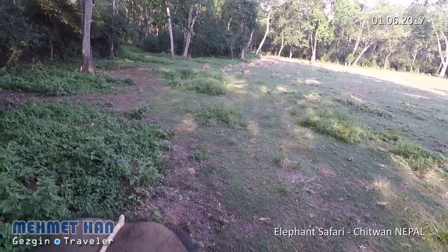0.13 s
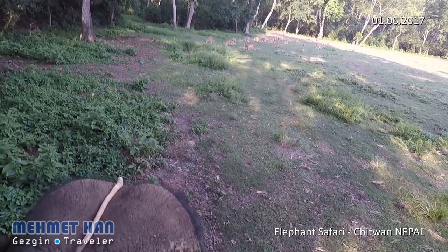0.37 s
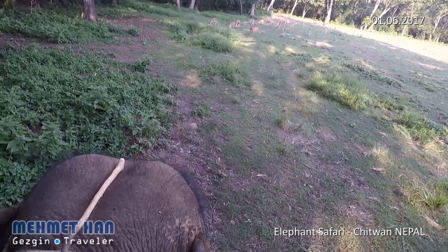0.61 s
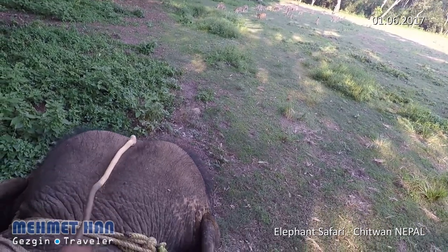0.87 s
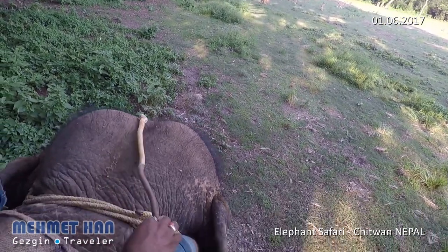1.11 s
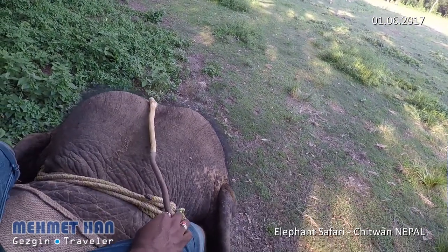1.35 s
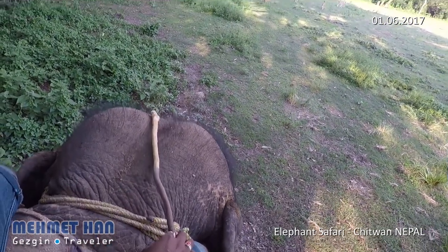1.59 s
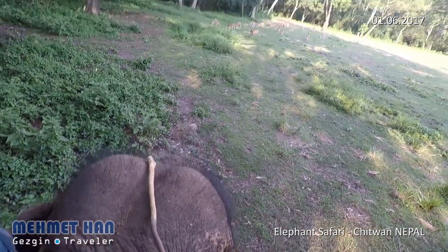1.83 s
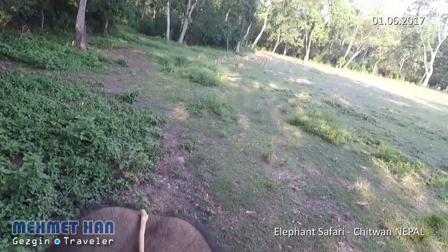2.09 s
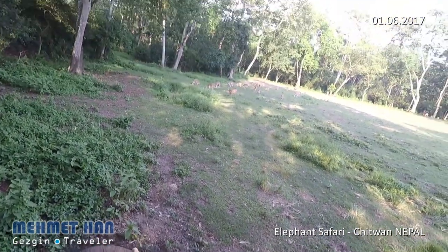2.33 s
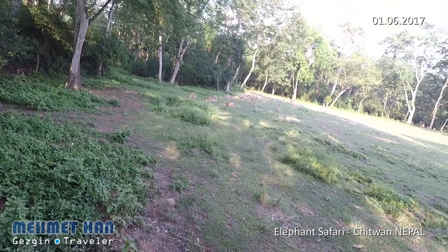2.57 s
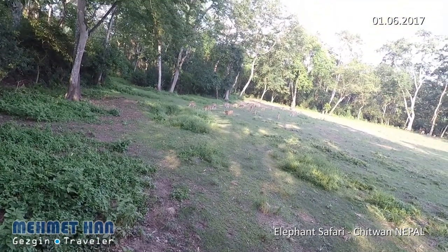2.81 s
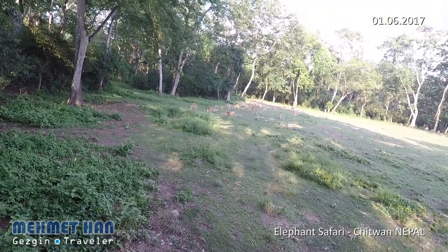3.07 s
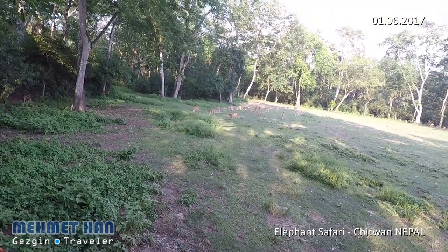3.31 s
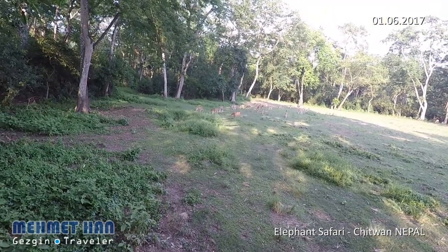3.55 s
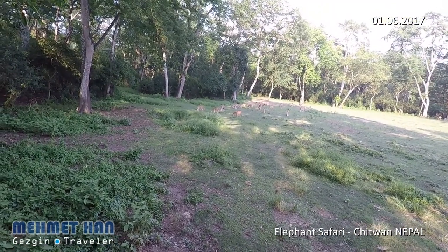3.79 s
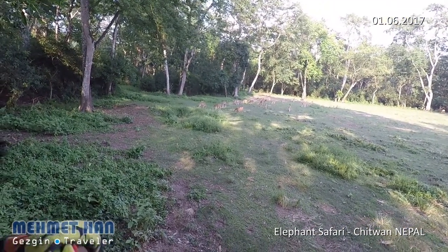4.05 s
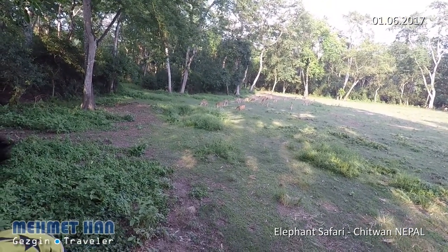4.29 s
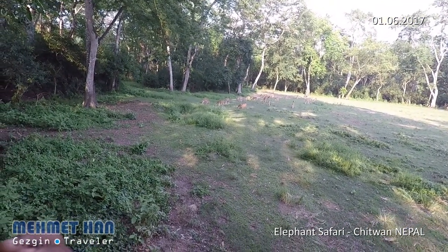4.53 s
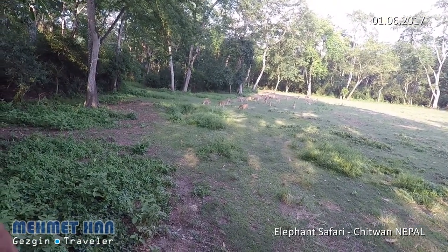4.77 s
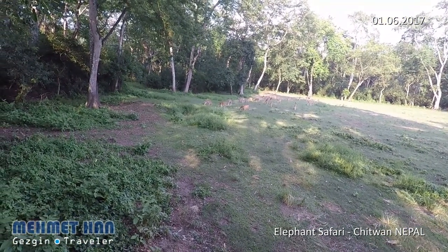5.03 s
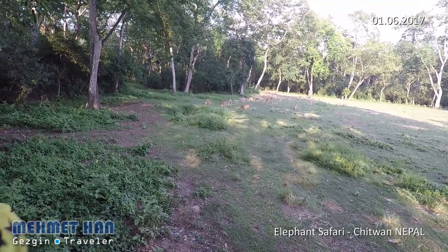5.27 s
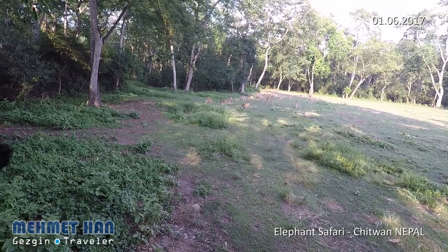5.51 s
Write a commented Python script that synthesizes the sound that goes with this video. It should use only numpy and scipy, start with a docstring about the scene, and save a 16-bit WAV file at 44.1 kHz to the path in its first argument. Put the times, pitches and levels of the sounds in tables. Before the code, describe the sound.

Outdoors at a forest edge, countless cicadas merge into one bright, sizzling high hiss. Beneath it lie soft low air noise and a weak rumble that sinks away. A small tick and muffled body knocks come from the handheld camera area during the first half, while a distant ground bird gives four short clucking, whistling phrases. One tiny two-toned gliding pipe follows past the middle, lightly scattered by the trees.

```python
"""A dense cicada chorus fills an open forest: overlapping click trains, coloured by ribbed membranes.
Under it lie a low wash of air, microphone hiss and a sinking rumble, all filtered noise.
A tick of filtered noise and soft knocks, summed decaying body modes, come early; two microphone ports hear all.
A far ground bird repeats two clucks, a burry whistle and a cluck, from ringing snaps and a noisy tone.
Late on, another bird pipes once with two gliding tones; trunks scatter the birds and the tick."""
import sys
import numpy as np
from scipy import signal
from scipy.fft import rfft, irfft
from scipy.io import wavfile
from scipy.ndimage import uniform_filter1d

SR = 44100
rng = np.random.default_rng(int(sys.argv[2]) if len(sys.argv) > 2 else 0)


def generate_wav(sig):
    """Save sig (samples, or channels by samples) to the path in sys.argv[1] as 16-bit PCM at SR."""
    pcm = np.round(np.clip(np.atleast_2d(sig).T, -1, 1) * 32767).astype(np.int16)
    wavfile.write(sys.argv[1], SR, pcm)


def elevation(decibels):
    """Turn decibel levels (scalar or array-like) into linear amplitude ratios."""
    levels = np.asarray(decibels, float)
    return 10 ** (levels / 20)


N = 248283  # samples


def evened(x):
    """Scales to rms 1."""
    return x / np.sqrt(np.mean(x ** 2) + 1e-20)


def smooth_twice(x, size, axis=-1):
    """Two running means of size samples."""
    return uniform_filter1d(uniform_filter1d(x, size=size, axis=axis), size=size, axis=axis)


def level_curve(rows):
    """Straight lines in dB through (s, dB) rows, at sample rate."""
    s, db = np.transpose(rows)
    return np.interp(np.arange(N) / SR, s, db)


def read(hz_points, values, hz):
    """Straight lines on a log-frequency axis."""
    return np.interp(np.log(hz + 1), np.log(np.asarray(hz_points) + 1), values)


def add(mix, s, sound, pan_db):
    """Lays a mono sound into both channels; pan_db is left minus right."""
    part = mix[:, round(s * SR):][:, :len(sound)]
    part += elevation([[pan_db / 2], [-pan_db / 2]]) * sound[:part.shape[1]]


def resonate(x, hz, pole_width_hz):
    """A steep resonance of gain 1: shift to zero, smooth by a double pole, shift back."""
    turn = np.exp(2j * np.pi * hz * np.arange(len(x)) / SR)
    r = np.exp(-np.pi * pole_width_hz / SR)
    smooth = signal.lfilter([(1 - r) ** 2], [1, -2 * r, r ** 2], x / turn)
    return 2 * (turn * smooth).real


# Port pair. Each row: frequency in Hz, likeness 0-1, left lead in rad, left minus right in dB.
PORT_PAIR = [(30, .3, 0, 3), (90, .1, 1.6, 1.5), (200, .22, 3.1, .6), (450, .55, 3.1, 0),
             (800, .76, 3.1, 0), (1300, .6, 3.1, 0), (1650, .23, 2.6, .5), (2700, .1, 1.7, 0),
             (3100, .3, .1, -1), (3900, .42, .1, 0), (4250, .7, 0, 0), (4800, .37, .4, 2),
             (6300, .5, 1.4, 3), (7200, .45, 1.5, 3.8), (7900, .35, 1.5, .5), (8300, .25, 1.5, -2),
             (9200, .28, 2.8, -3), (10500, .14, 2, -1), (15000, .05, 2, -1)]


def at_ports(fields, spectrum):
    """Two unrelated sound fields get their colour and reach the ports partly alike; mid rms 1."""
    hz = np.fft.rfftfreq(N, 1 / SR)
    port_hz, *columns = np.transpose(PORT_PAIR)
    alike, lead_rad, lean_db = (read(port_hz, c, hz) for c in columns)
    alike = np.clip(alike, 0, 1)
    a, b = rfft(fields, axis=1)
    right = alike * np.exp(-1j * lead_rad) * a + np.sqrt(1 - alike ** 2) * b
    lean = elevation([lean_db / 2, -lean_db / 2])
    mid = np.sqrt((lean ** 2).sum(0) + 2 * alike * np.cos(lead_rad))  # the colour is that of the mid
    colour = elevation(read(*np.transpose(spectrum), hz))
    out = irfft(np.array([a, right]) * lean * colour / mid, N, axis=1)
    return out / np.sqrt(np.mean(out.mean(0) ** 2))


# Chorus loudness. Each row: time in seconds, mid rms in dB before surges.
CHORUS_LEVEL = [(0.0, -34), (0.12, -33), (0.53, -34), (0.61, -32.5), (0.88, -33), (0.91, -35.5),
                (0.95, -31), (1.16, -34), (1.3, -33), (5.63, -33.5)]
# Colour of all ribbed membranes together. Each row: frequency in Hz, relative density in dB.
TYMBAL_COLOUR = [(2530, -102), (4200, -58), (4400, -30.5), (4920, -22), (5800, -2), (6300, 1.5),
                 (6700, -2.5), (7150, -5), (7750, -8.5), (8200, -15.5), (8900, -20), (12500, -43),
                 (16200, -36), (22000, -120)]


def cicadas(count=110, slowest_hz=160, fastest_hz=420, jitter=.25, nearness_db=3, surge_db=0.6):
    """Every male buckles its membranes in an uneven click train; hundreds of trains overlap to a hiss."""
    fields = np.zeros((2, N))
    for field in fields:
        rates_hz = np.geomspace(slowest_hz, fastest_hz, count)
        for rate_hz, size, start in zip(rates_hz, rng.standard_normal(count), rng.random(count)):
            gaps, side = rng.standard_normal((N // 70, 2)).T
            periods = np.cumsum(np.clip(1 + jitter * gaps, .2, 3)) - start
            at = (periods * SR / rate_hz).astype(int)
            inside = at < N
            field[at[inside]] += elevation(nearness_db * size) * np.sign(side[inside])  # ribs snap in or out
    surges = evened(smooth_twice(rng.standard_normal((2, N)), 1500))
    fields = np.array([evened(field) for field in fields]) * elevation(surge_db * surges)
    return elevation(level_curve(CHORUS_LEVEL)) * at_ports(fields, TYMBAL_COLOUR)


# Leaves and air. Each row: frequency in Hz, relative density in dB.
WASH_COLOUR = [(13, -54), (22, -34), (50, -31), (107, -31), (128, -9.5), (163, 0.5), (351, -8), (391, -9.5),
               (427, -8.5), (509, -11), (1010, -14.5), (1370, -16.5), (1530, -16), (3300, -16.5),
               (3700, -19), (4250, -19.5), (5460, -9.5), (9240, -120)]
# Microphone hiss. Each row: frequency in Hz, relative density in dB.
HISS_COLOUR = [(9000, -8), (11500, -35), (13500, 16), (14900, -4), (15100, -17), (15200, -60)]
WASH_RMS_DB, HISS_RMS_DB = -53, -71  # of the mid


def wash(patchy_db=1.69):
    """Leaves, air and microphone hiss: filtered noise whose level drifts in time-frequency patches."""
    z = signal.stft(rng.standard_normal((2, N + 1024)), SR, nperseg=1024, noverlap=768)[2]
    patches = rng.standard_normal(z.shape[1:])
    patches = uniform_filter1d(uniform_filter1d(patches, size=8, axis=0), size=8, axis=1)
    patchy = z * elevation(patchy_db * evened(patches))
    fields = signal.istft(patchy, SR, nperseg=1024, noverlap=768)[1][:, :N]
    air = elevation(WASH_RMS_DB) * at_ports(fields, WASH_COLOUR)
    return air + elevation(HISS_RMS_DB) * at_ports(fields, HISS_COLOUR)


# Rumble colour. Each row: frequency in Hz, relative density in dB.
RUMBLE_COLOUR = [(13, -32), (24, 4), (45, -9), (80, -6), (110, -24), (200, -80)]
# Rumble loudness. Each row: time in seconds, mid rms in dB before lumps.
RUMBLE_RMS = [(0, -76), (1.0, -82), (1.6, -78), (2.3, -83), (3.2, -88), (5.63, -92)]


def rumble(lump_db=3):
    """Lumpy low noise as the camera swings, sinking in level once it is held still."""
    lumps = evened(smooth_twice(rng.standard_normal(N), 4000))
    noise = at_ports(rng.standard_normal((2, N)), RUMBLE_COLOUR)
    return elevation(level_curve(RUMBLE_RMS) + lump_db * lumps) * noise


# Dry tick. Each row: start in seconds, direct peak in dB, left minus right in dB.
TWIG_TICKS = [(0.2506, -38, 0.0)]


def twig(decay_s=0.0014):
    """A decaying noise burst through one broad resonance makes a short tick."""
    out, t = np.zeros((2, N)), np.arange(600) / SR
    for s, db, pan_db in TWIG_TICKS:
        tick = resonate(rng.standard_normal(len(t)) * np.exp(-t / decay_s), 3100, 1700)
        add(out, s, elevation(db) * tick / abs(tick).max(), pan_db)
    return out


# Camera-body knocks. Each row: start in seconds, left peak in dB, right peak in dB (before the low cut),
# right polarity -1 or 1, frequency in Hz that the contact favours, share of the free ring time.
BODY_KNOCKS = [(.394, -33.5, -45, 1, 139, 0.96), (.574, -51, -48, 1, 1400, 0.93),
               (1.555, -29.5, -23, -1, 430, 0.92), (1.578, -34.5, -40, -1, 190, 0.84),
               (1.9972, -36, -39, 1, 620, 0.26), (2.084, -33.5, -43, -1, 170, 1.01),
               (2.507, -49, -41, -1, 800, 0.77), (2.961, -47, -35.5, -1, 1400, .7),
               (3.184, -43, -47, 1, 990, .7)]
# Body modes. Each row: frequency in Hz, relative level in dB, free t60 in seconds.
BODY_MODES = [(174, 5, 0.067), (300, -2, 0.033), (413, 2.5, 0.055), (483, 0.7, 0.035), (572, -1.1, 0.019),
              (690, -1, 0.02), (840, -2, 0.02), (1080, 7, 0.023), (1294, 2.1, 0.022)]
CONTACT_DB = -5.5  # one octave from the favoured pitch, growing with the square
SNAP_DB, SNAP_T60_S = -7.5, 0.015  # the first instant stirs all modes alike
LOW_CUT_HZ = 124


def knocks(rise_s=0.0022):
    """Each bump rings the same body modes; a harder contact favours higher ones, a grip damps them."""
    out, t = np.zeros((2, N)), np.arange(5000) / SR
    snap = elevation(SNAP_DB - 60 * t / SNAP_T60_S)
    for s, left_db, right_db, sign, favoured_hz, free in BODY_KNOCKS:
        ring = np.zeros(len(t))
        for hz, db, t60_s in BODY_MODES:
            contact_db = CONTACT_DB * np.log2(hz / favoured_hz) ** 2
            decay = elevation(db + contact_db - 60 * t / (free * t60_s))
            ring += (snap + decay) * np.sin(2 * np.pi * hz * t)
        ring *= 1 - np.exp(-t / rise_s)
        ring /= abs(ring).max()
        out[:, round(s * SR):][:, :len(t)] += elevation([[left_db], [right_db]]) * [[1], [np.sign(sign)]] * ring
    low_cut = signal.butter(4, LOW_CUT_HZ, "high", fs=SR, output="sos")
    return signal.sosfilt(low_cut, out)  # the microphones cut the bass


# Clucks, two before and one after each whistle. Each row: start in seconds, direct peak in dB before pan,
# upper resonance in Hz, lower resonance in Hz, lower re upper gain in dB.
BIRD_CLUCKS = [(.531, -45, 3400, 1950, -5), (.608, -41, 3200, 1980, -2), (.782, -44, 3400, 1800, -6),
               (1.054, -45.5, 2450, 2120, 0), (1.135, -48, 3600, 2000, -6), (1.304, -46.5, 3700, 1700, -5),
               (2.099, -46, 3400, 2050, 1), (2.180, -44, 3400, 2000, -7), (2.349, -42.5, 3590, 1650, -2),
               (2.757, -39, 3170, 1950, -3), (2.838, -42, 3200, 2000, -12), (3.007, -42, 3120, 1780, -7)]
# Whistles. Each row: start in seconds, tone level in dB, hoarse band centre in Hz, left minus right in dB.
BIRD_WHISTLES = [(.712, -58, 3180, -8), (1.236, -63, 3000, 14), (2.281, -60.5, 3220, 13),
                 (2.937, -60, 3100, -13)]
UPPER_POLE_WIDTH_HZ, LOWER_POLE_WIDTH_HZ, HOARSE_POLE_WIDTH_HZ = 510, 300, 440
WHISTLE_HZ, WHISTLE_LENGTH_S = 1842, 0.0726
SCOOP_HZ, SETTLE_S = 165, .026  # starts sharp, settles on the held pitch
SWELL_DB, SWELL_S, ATTACK_S, RELEASE_S = -3, .045, .0036, .004
HOARSE_DB, HOARSE_SWELL_DB = -3.5, -5  # at mid-length; change from end to start


def ground_bird(decay_s=0.0055, rasp=0.38):
    """Cluck snaps ring two throat resonances; the whistle is a burry tone with a hoarse band above."""
    out, t, u = np.zeros((2, N)), np.arange(2000) / SR, np.arange(0, WHISTLE_LENGTH_S, 1 / SR)
    hz = WHISTLE_HZ + SCOOP_HZ * np.exp(-u / SETTLE_S)
    soft = np.clip(np.minimum(u / ATTACK_S, (WHISTLE_LENGTH_S - u) / RELEASE_S), 0, 1)
    swell = elevation(SWELL_DB * np.maximum(1 - u / SWELL_S, 0))
    growing = elevation(HOARSE_DB + HOARSE_SWELL_DB * (0.5 - u / WHISTLE_LENGTH_S))
    starts, *_, pans_db = np.transpose(BIRD_WHISTLES)
    for s, db, upper_hz, lower_hz, lower_db in BIRD_CLUCKS:
        snap = rasp * rng.standard_normal(len(t)) * (np.exp(-t / decay_s) + 0.13 * np.exp(-t / 0.03))
        snap[0] = 4
        upper = resonate(snap, upper_hz, UPPER_POLE_WIDTH_HZ)
        cluck = upper + elevation(lower_db) * resonate(snap, lower_hz, LOWER_POLE_WIDTH_HZ)
        pan_db = pans_db[abs(starts - s).argmin()]  # that of the nearest whistle
        add(out, s, elevation(db) * cluck / abs(cluck).max(), pan_db)
    for s, db, hoarse_hz, pan_db in BIRD_WHISTLES:
        flutter = evened(uniform_filter1d(rng.standard_normal(4410), size=110))[:len(u)]
        waver = 1 + 0.4 * flutter  # from far leaves
        tone = np.sqrt(2) * waver * np.sin(2 * np.pi * np.cumsum(hz) / SR)
        hoarse = evened(resonate(rng.standard_normal(len(u)), hoarse_hz, HOARSE_POLE_WIDTH_HZ))
        add(out, s, elevation(db) * soft * (swell * tone + growing * hoarse), pan_db)
    return out


# Lower voice of one syrinx. Each row: time in seconds, pitch in Hz, tone level in dB.
LOW_VOICE = [(3.648, 1240, -66), (3.668, 1360, -60), (3.686, 1450, -60), (3.697, 1530, -53),
             (3.709, 1620, -51), (3.722, 1680, -59), (3.735, 1678, -56.5), (3.756, 1600, -62),
             (3.766, 1570, -68), (3.776, 1510, -60), (3.786, 1460, -68)]
# Upper voice. Each row: time in seconds, pitch in Hz, tone level in dB.
HIGH_VOICE = [(3.664, 1740, -64), (3.676, 1850, -59), (3.687, 1935, -53), (3.697, 2000, -58),
              (3.703, 2030, -72)]
LOW_PAN_DB, HIGH_PAN_DB = -3, 2.1  # left minus right
OCTAVE_DB, TWELFTH_DB, BURR_DEPTH = -9, -12, .3  # overtones re the tone


def piping_bird():
    """Two gliding, slightly burry tones; the lower one carries overtones while it rises."""
    out = np.zeros((2, N))
    for rows, rich, pan_db in ((LOW_VOICE, 1, LOW_PAN_DB), (HIGH_VOICE, 0, HIGH_PAN_DB)):
        s, *columns = np.transpose(rows)
        t = np.arange(s[0], s[-1], 1 / SR)
        hz, db = (np.interp(t, s, c) for c in columns)
        soft = signal.windows.tukey(len(t), .15)
        phase = 2 * np.pi * np.cumsum(hz) / SR
        rising = rich * uniform_filter1d(1. * (np.gradient(hz) > 0), size=600)
        flutter = evened(uniform_filter1d(rng.standard_normal(8820), size=120))[:len(hz)]
        burr = 1 + BURR_DEPTH * flutter
        overtones = elevation(OCTAVE_DB) * np.sin(2 * phase) + elevation(TWELFTH_DB) * np.sin(3 * phase)
        voice = np.sin(phase) + rising * overtones
        add(out, s[0], np.sqrt(2) * soft * elevation(db) * burr * voice, pan_db)
    return out


def trunks(t60_s, wet_db):
    """Direct sound, then scattering from trunks: sparse taps of random sign, other ones per channel."""
    slots = np.arange(220, SR // 2 - 20, 20)
    shape = (2, len(slots))
    taps = np.zeros((2, SR // 2))
    np.put_along_axis(taps, slots + rng.integers(0, 20, shape), rng.choice([-1., 1.], shape), axis=1)
    taps *= elevation(-60 / t60_s * np.arange(SR // 2) / SR)
    taps *= elevation(wet_db) / np.linalg.norm(taps[0])
    taps[:, 0] = 1
    return taps


def scene():
    """Birds and twig scatter among the trunks; chorus, wash, rumble and knocks join them."""
    far = twig() + ground_bird() + piping_bird()
    far = signal.fftconvolve(far, trunks(t60_s=0.26, wet_db=-9), axes=1)[:, :N]
    return cicadas() + wash() + rumble() + knocks() + far


def low_pass(x):
    """Removes everything above the highest recorded frequency."""
    return signal.sosfilt(signal.butter(12, 15500, fs=SR, output="sos"), x)


def record(dry):
    """A steep linear-phase low-pass limits the band."""
    edge = signal.firwin(801, 15120, window=("kaiser", 9), fs=SR)  # Hz
    return low_pass(signal.oaconvolve(dry, edge[None], "same"))


dry = scene()
out = record(dry)
generate_wav(out)
```